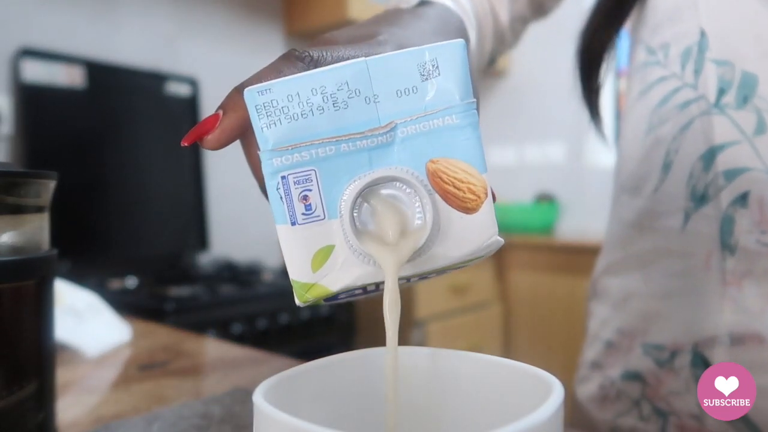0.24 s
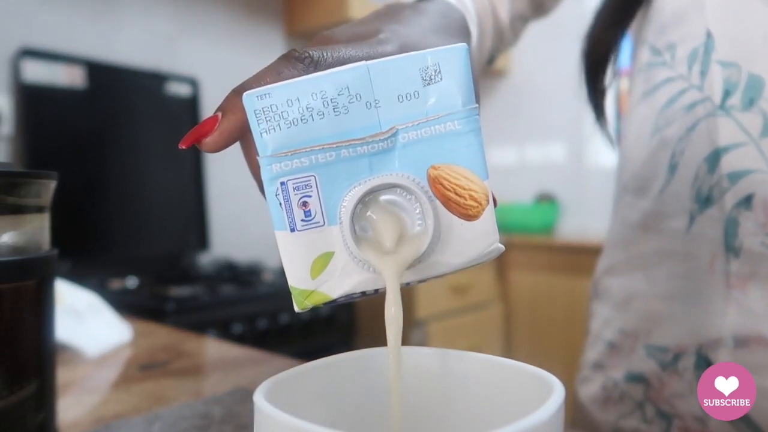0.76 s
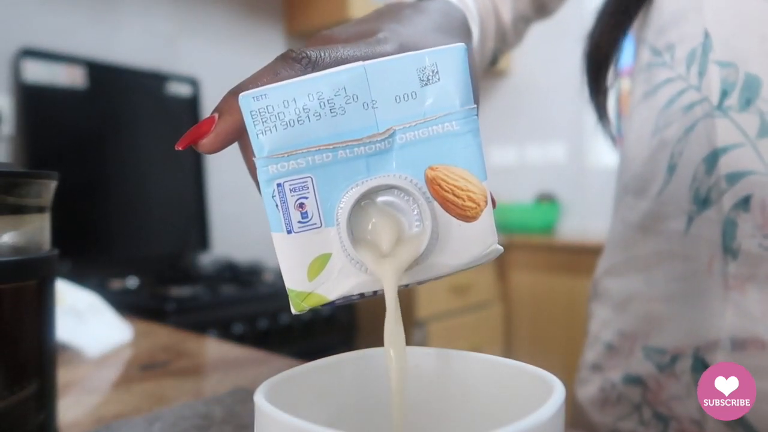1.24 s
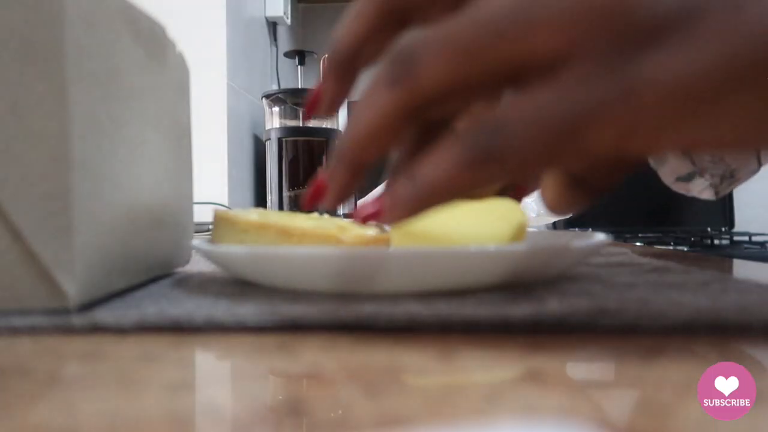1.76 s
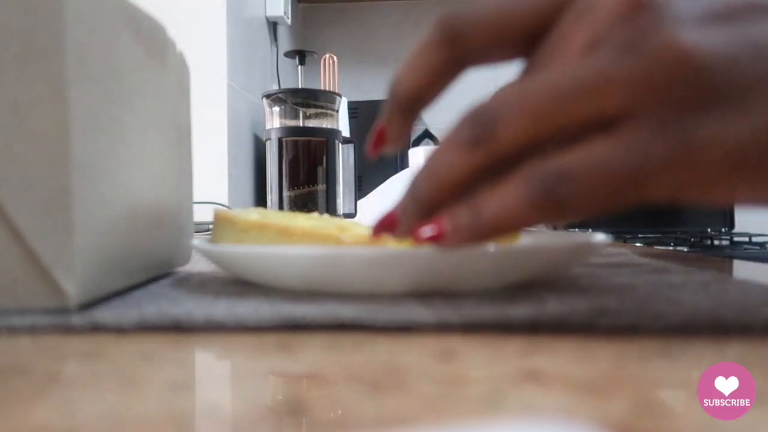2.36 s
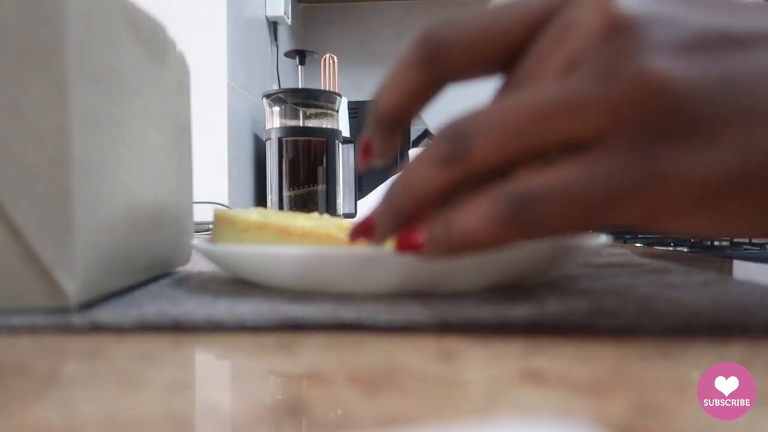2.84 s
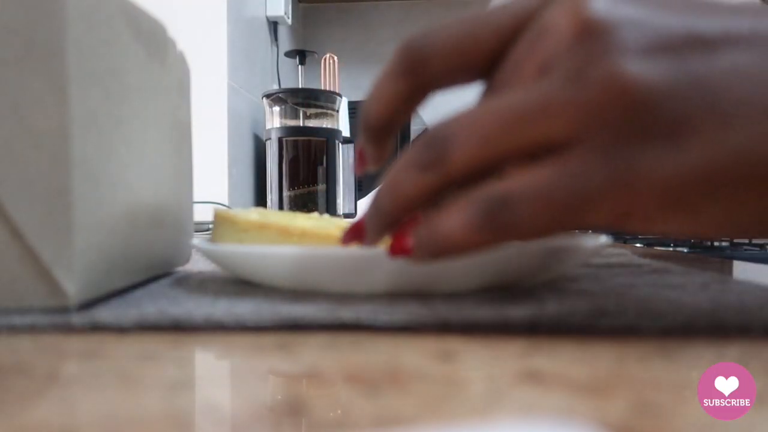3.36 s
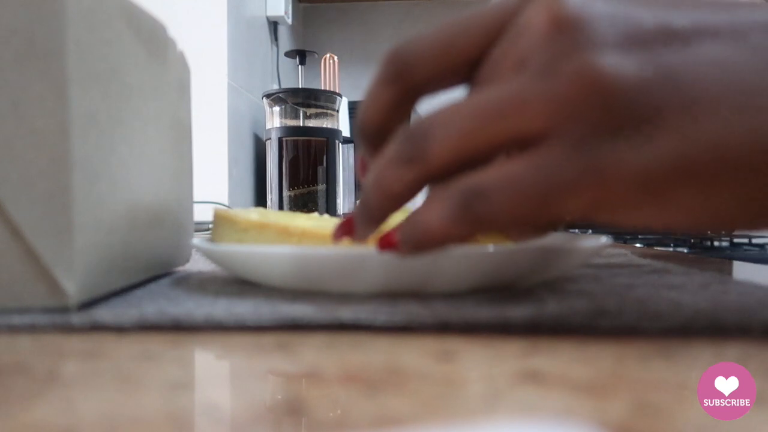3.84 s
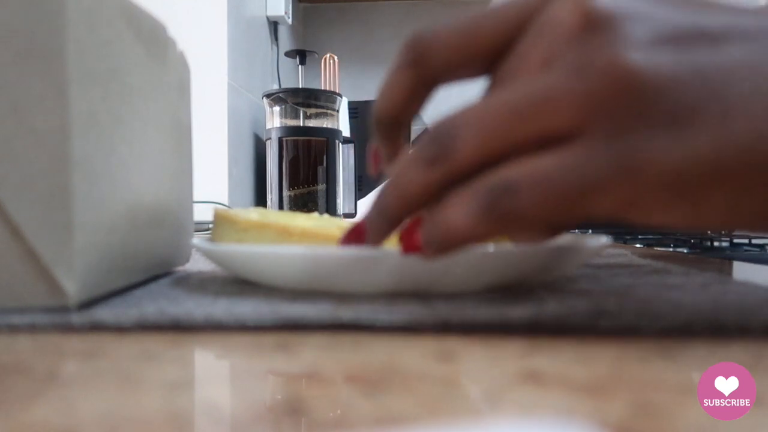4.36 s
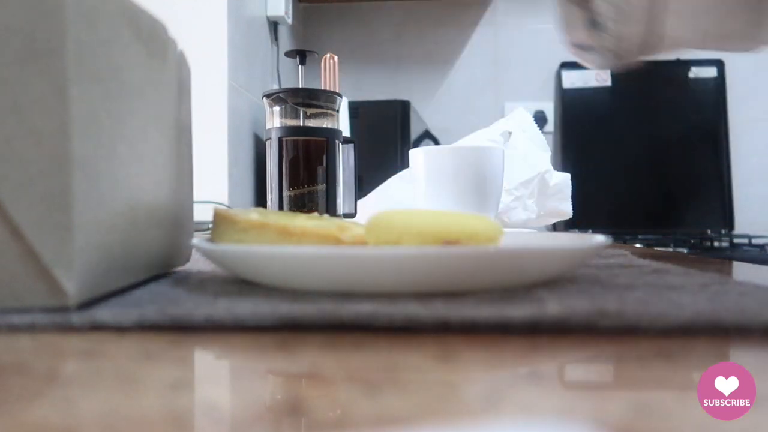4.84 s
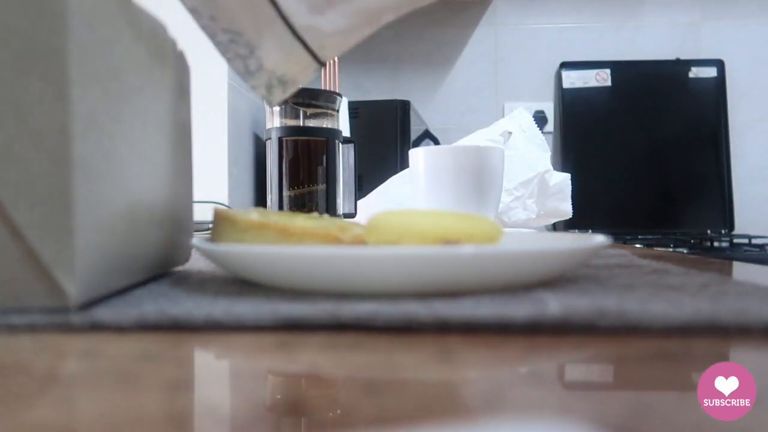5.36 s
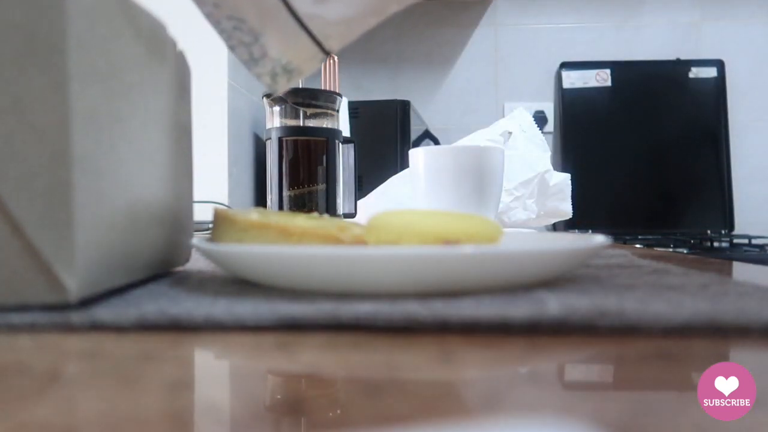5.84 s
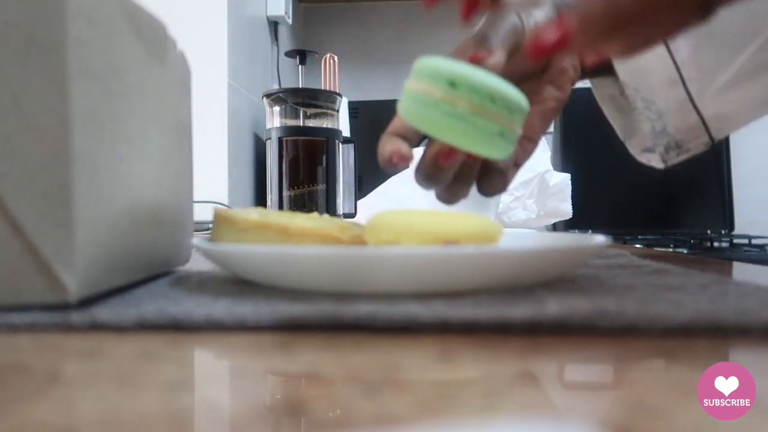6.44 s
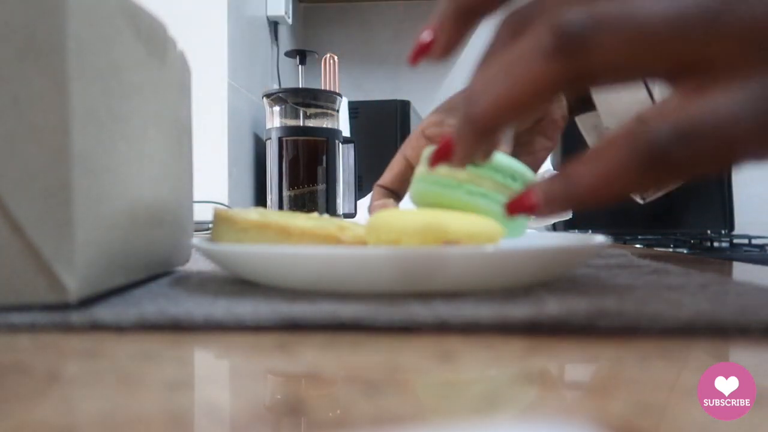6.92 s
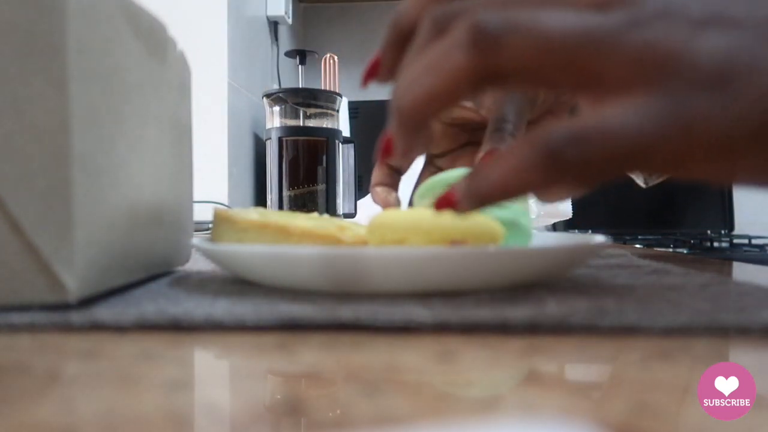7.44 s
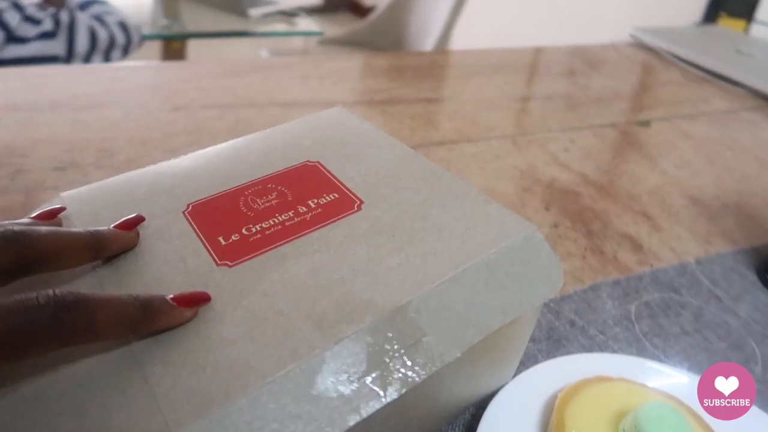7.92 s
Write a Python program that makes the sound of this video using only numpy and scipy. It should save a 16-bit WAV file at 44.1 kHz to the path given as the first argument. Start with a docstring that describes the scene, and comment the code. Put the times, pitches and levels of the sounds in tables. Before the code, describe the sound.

A nearly silent kitchen with faint low air and hiss lasts until 1.4 s, when a clothes dryer comes in at once. Its low, muffled rumble continues to the end, the drum turning about twice a second: soft wet-cloth thuds, harder clacks, button ticks and a light swish of sliding load fall in nearly the same pattern each turn, slowing imperceptibly after 5 s. Close to the counter-top stereo microphone, skin or sleeve brushes card from 1.5 to 2.5 s, with small nail ticks on china around 1.75-1.85 and 2.4 s. A clearer plate tick comes at 4.5 s, then light brushing. Between 5.35 and 5.85 s a cardboard box is tapped and scuffed, with the sharpest snap near 5.55. Brighter plate ticks follow at 7.1 and 7.4 s, with box thumps at 7.4 and 7.7. From 7.95 s the box slides with a swelling dry rasp, small taps and a brief low shudder at 8.1.

```python
"""Quiet kitchen noise, then a clothes dryer comes in at once, its drum turning about twice a second.
Noise through cabinet resonances makes its rumble; swelling notes knock at nearly the same places each turn.
Close by, fingernails tick on a china plate (decaying modes with a scratch of noise), and a cardboard
pastry box is tapped, scuffed, brushed and slid (clicks and noise through card resonances).
A small stereo microphone stands on the counter."""
import sys
import numpy as np
from scipy import signal
from scipy.fft import rfft, irfft, next_fast_len
from scipy.io import wavfile
from scipy.ndimage import uniform_filter1d

SR = 44100
rng = np.random.default_rng(int(sys.argv[2]) if len(sys.argv) > 2 else 0)


def unload_audio(sound):
    """Save the sound as a 16-bit wav file, at the path given as the first command line argument."""
    columns = np.transpose(np.atleast_2d(sound))
    # keep every value between -1 and 1, then stretch to whole-number steps
    steps = np.round(np.clip(columns, -1, 1) * 32767)
    wavfile.write(sys.argv[1], SR, steps.astype(np.int16))


N = 360958
TIME = np.arange(N) / SR
SIZE = next_fast_len(N + SR // 10, True)
FREQ = np.maximum(np.arange(SIZE // 2 + 1) * SR / SIZE, 1)


def undb(db):
    """Decibels to gain."""
    return 10 ** (np.asarray(db) / 20)


def unit(x):
    """Scale to rms 1."""
    return x / np.sqrt(np.mean(x ** 2))


def colour(points):
    """Gain at every frequency, drawn through (Hz, dB) points on a logarithmic frequency axis."""
    hz, db = np.transpose(points)
    return undb(np.interp(np.log(FREQ), np.log(hz), db))


def body(modes, freq=FREQ):
    """Complex response of a set of (Hz, width in Hz, dB) resonances."""
    return sum(undb(db) / (1 + 1j * (freq ** 2 - hz ** 2) / (freq * width)) for hz, width, db in modes)


def shape(x, response):
    """Filter a sound by a frequency response."""
    return irfft(rfft(x, SIZE) * response, SIZE)[..., :N]


def add(track, s, sound):
    """Mix a short sound into a track at s seconds."""
    start = max(int(s * SR), 0)
    part = sound[:max(N - start, 0)]
    track[start:start + len(part)] += part


def wander(count):
    """A random line through count evenly spaced points over the whole scene."""
    return np.interp(TIME, np.linspace(0, TIME[-1], count), rng.standard_normal(count))


# Microphone side signal against mid, for sound that fills the room.
# Each row: frequency in Hz, level in dB.
ROOM_WIDTH = [(60, -44), (110, -42), (200, -12.5), (380, -1), (700, -2), (2400, -3), (4400, 1), (8100, 0.5),
              (15000, 1.5)]
# The same for sound that arrives mostly straight from its source.
# Each row: frequency in Hz, level in dB.
STRAIGHT_WIDTH = [(60, -70), (200, -62), (380, -23.5), (700, -24), (1300, -10.5), (2400, -37), (4400, -12)]


def spread(mid, side, width):
    """Two close microphone ports: alike in the bass, less so higher up."""
    side = shape(side, colour(width))
    return np.array([mid + side, mid - side])


def diffuse(response, width):
    """Stereo noise of a given colour, its mid at rms 1."""
    mid, side = (unit(shape(rng.standard_normal(N), response)) for _ in range(2))
    return spread(mid, side, width)


def place(x, pan_db):
    """Put a near sound to the left (positive) or right (negative)."""
    return x * undb(np.array([[pan_db], [-pan_db]]) / 2)


def echo(x, t60):
    """Dense reflections from the kitchen walls, as strong as the sound itself."""
    t = TIME[:SR // 2]
    # the first reflection comes after 4 ms
    tail = rng.standard_normal(len(t)) * undb(-60 * t / t60) * (t > .004)
    return signal.fftconvolve(x, tail / np.linalg.norm(tail))[:N]


def room(x, t60, wet_db):
    """The wall reflections at both ports."""
    return undb(wet_db) * spread(echo(x, t60), echo(x, t60), ROOM_WIDTH)


# Colour of the still kitchen.
# Each row: frequency in Hz, relative level in dB.
KITCHEN_COLOUR = [(12, -31), (20, -2.5), (31, -4.5), (48, -10), (74, -9), (103, -4.5), (121, -7),
                  (302, -15.5), (367, -20), (638, -24.5), (1930, -30), (2280, -31.5), (2770, -33.5),
                  (12400, -51.5), (15000, -64)]
KITCHEN_DB = -47.5


def kitchen():
    """Faint steady air and hiss that fill the room: coloured noise, wide in the treble."""
    return undb(KITCHEN_DB) * diffuse(colour(KITCHEN_COLOUR), ROOM_WIDTH)


FIRST_TURN_S, TURN_S = 1.0234, .4986  # the turns are counted from before the drum is heard

# Wet cloth landing in the drum on every turn, heard along the counter.
# Each row: seconds into the turn, pitch in Hz, mean peak of the main note in dB, swell in seconds,
# share of pitch lost per second (negative: gained).
CLOTH_THUDS = [(.001, 94, -32.5, .012, 3), (.063, 119.5, -24.5, 0.015, 4), (.103, 100.2, -32, 0.023, 2),
               (.154, 116.6, -25.5, .018, -0.5), (.184, 179, -29.5, 0.014, 1.5),
               (.216, 144.7, -29.5, 0.024, 2), (.258, 122.6, -28, 0.02, 3), (.284, 127, -23.5, 0.011, 1),
               (.287, 192, -31.5, 0.0056, -0.5), (.28, 66, -30, 0.015, -2.5), (.331, 139, -29, 0.007, -4.5),
               (.348, 98.4, -33.5, 0.015, -0.5), (.346, 177, -36.5, .011, 1.5),
               (.383, 151.7, -34, 0.023, 1), (.39, 67.5, -35, 0.033, -0.5), (.421, 169.5, -28.5, 0.011, 6),
               (.438, 116, -29, 0.014, 0), (.488, 142.4, -31.5, 0.014, 3.5)]


def thuds():
    """Wet cloth lands softly: low notes with a faint overtone."""
    return knocks(CLOTH_THUDS, overtone=2.3, overtone_db=-13.5, grit=0.23)


# Hard parts of the load striking the drum on every turn.
# Each row: seconds into the turn, pitch in Hz, mean peak of the main note in dB, swell in seconds,
# share of pitch lost per second (negative: gained).
HARD_CLACKS = [(.041, 523.3, -40, 0.02, 1), (.067, 247, -39.5, 0.0042, 2.5),
               (.068, 316.7, -36.5, 0.02, 0.5), (.147, 460, -31, 0.0075, -2),
               (.151, 684, -44.5, 0.003, -10), (.165, 567, -36, 0.017, 1), (.166, 470.4, -35, 0.017, 1.5),
               (.162, 809.4, -37, 0.012, -1), (.168, 929, -47.5, 0.02, 0.5), (.203, 811, -46, .017, 3.5),
               (.25, 1247, -46, 0.033, 1.5), (.253, 977, -40, 0.0049, -0.5), (.258, 946, -41.5, 0.017, -1),
               (.259, 385, -35, 0.014, 0.5), (.263, 807, -39, .01, 0.5), (.284, 285, -29.5, 0.008, 0),
               (.322, 833, -43.5, 0.011, -0.5), (.324, 272.5, -34.5, 0.011, 0.5),
               (.345, 843, -44, 0.0098, .5), (.346, 1013, -48, .017, 1.5), (.376, 1229, -52.5, 0.015, 1.5),
               (.395, 442, -39, .014, 1)]


def clacks():
    """Hard parts strike the drum: mostly higher, rougher notes with an octave above."""
    return knocks(HARD_CLACKS, overtone=2.0, overtone_db=-15.0, grit=0.55)


def knocks(table, overtone, overtone_db, grit, brightening=1.0, scatter_db=1.1, jitter_s=0.00049):
    """Blows that land nearly alike on every turn; each swells and fades on its own note, weaker ones duller."""
    out, t = np.zeros(N), TIME[:SR // 8]
    hardest = max(row[2] for row in table)
    for turn in np.arange(FIRST_TURN_S, N / SR, TURN_S):
        for s, hz, db, swell, sag in table:
            late, force = rng.standard_normal(2)
            push = (t / swell * np.exp(1 - t / swell)) ** 2
            # the load drags as it lands: a random walk of phase smears the note
            steps = uniform_filter1d(rng.standard_normal(len(t)), size=64)
            drag = grit * np.sqrt(hz / SR) * np.cumsum(steps)
            phase = 2 * np.pi * hz * (t - sag * t ** 2 / 2) + drag
            overtone_gain = undb(overtone_db - brightening * (hardest - db))
            note = np.sin(phase) + overtone_gain * np.sin(overtone * phase)
            add(out, turn + s + jitter_s * late, undb(db + scatter_db * force) * push * note)
    return out


# Buttons and zips ticking on the drum wall on every turn.
# Each row: seconds into the turn, frequency in Hz, level in dB.
BUTTON_TICKS = [(.044, 559, -34.5), (.169, 677, -36), (0.194, 1160, -52), (.254, 1240, -42.5),
                (.267, 900, -42.5), (.324, 1170, -46), (.401, 834, -38)]


def buttons(attack_s=0.0021, decay_s=0.0039, width_share=0.49):
    """Small hard things tick on the drum wall: a sudden, quickly damped burst around one note."""
    out = np.zeros(N)
    for s, hz, db in BUTTON_TICKS:
        age = (TIME - FIRST_TURN_S - s) % TURN_S
        # cubing the resonance narrows it
        wall = unit(shape(rng.standard_normal(N), body([(hz, hz * width_share, 0)]) ** 3))
        out += undb(db) * wall * np.minimum(age / attack_s, 1) * np.exp(-age / decay_s)
    return out


# The load slipping down the drum wall on every turn.
# Each row: seconds into the turn, relative level in dB.
LOAD_SLIPS = [(0.043, 6), (0.15, 22), (0.247, 28)]
SLIP_ATTACK_S, SLIP_HOLD_S, SLIP_RELEASE_S, ROLLING_DB = 0.0042, 0.033, 0.1, -14


def sliding():
    """How hard the load slides: every slip starts quickly, holds and dies away over steady rolling."""
    slide = undb(ROLLING_DB)
    for s, db in LOAD_SLIPS:
        age = (TIME - FIRST_TURN_S - s) % TURN_S
        fade = np.exp(-np.maximum(age - SLIP_ATTACK_S - SLIP_HOLD_S, 0) / SLIP_RELEASE_S)
        slip = undb(db) * np.minimum(age / SLIP_ATTACK_S, 1) * fade
        slide = np.maximum(slide, slip)
    return slide


# Drum and cabinet resonances.
# Each row: frequency in Hz, width in Hz, relative level in dB.
CABINET_MODES = [(53, 7.5, -2.5), (71, 18, -4), (93.8, 10.7, -3), (111.6, 13.4, 3), (159.7, 16.5, 0.5),
                 (187.7, 30, -1), (264.6, 65, -2.5), (324, 4.6, -5.5), (385, 28.5, -0.5), (436, 33, -9.5),
                 (486, 82, -9.5), (613, 360, -17), (782, 21, -6), (960, 6.2, -4), (1120, 10, -33),
                 (1340, 31, -45)]
# Hiss of the sliding load.
# Each row: frequency in Hz, relative level in dB.
SWISH_COLOUR = [(150, -36), (400, -15), (780, 15.5), (1200, -8.5), (1500, -1), (2000, 0), (2600, -5.5),
                (4000, -15.5), (8000, -25.5), (15000, -50)]
DRUM_ON_S, DRUM_RISE_S = 1.405, 0.0075
SLOWS_S, SLOWING = 5.0, .0024  # from this time on the drum loses this share of its speed


def dryer(rumble_db=-35.5, rattle_db=-49.0, swish_db=-55, ring_db=-17, fresh=0.71,
          split_hz=330, lowest_hz=46, muffle_hz=1350, pan_db=-2.0):
    """The load rolls, slides and knocks in the drum, and the cabinet rings with the rolling and the blows."""
    slide = sliding()
    # the same bumps come round on each turn, with some fresh tumbling on top
    turn_bumps = rng.standard_normal(int(TURN_S * SR))
    bumps = np.resize(turn_bumps, N) + fresh * rng.standard_normal(N)
    cabinet = body(CABINET_MODES) / (1 + (lowest_hz / FREQ) ** 8) / (1 + (FREQ / muffle_hz) ** 8)
    low = 1 / (1 + (FREQ / split_hz) ** 4)
    # the heavy low modes roll on evenly; the light upper ones follow the sliding load
    rumble = undb(rumble_db) * unit(shape(bumps * slide ** 0.17, cabinet * low))
    rattle = undb(rattle_db) * unit(shape(bumps * slide ** 0.42, cabinet * (1 - low)))
    blows = thuds() + clacks()
    ringing = undb(ring_db) * shape(blows, cabinet)
    drum = blows + ringing + buttons() + rumble + rattle
    # slowing stretches time, and so lowers the pitch a little too
    slowed_time = TIME - SLOWING * np.maximum(TIME - SLOWS_S, 0)
    drum = np.interp(slowed_time, TIME, drum)
    swish = undb(swish_db) * unit(slide ** 0.71) * diffuse(colour(SWISH_COLOUR), STRAIGHT_WIDTH)
    # wall echoes reach the two ports unequally; only the upper notes show where the machine stands
    stereo = spread(drum, echo(drum, t60=0.1), STRAIGHT_WIDTH) + swish
    stereo = shape(stereo, place(np.ones(len(FREQ)), pan_db) ** (1 - low))
    return stereo * np.clip((TIME - DRUM_ON_S) / DRUM_RISE_S, 0, 1)


# Dry rubbing of cardboard, close to the microphone.
# Each row: frequency in Hz, relative level in dB.
RUB_COLOUR = [(300, 7), (550, 4), (1150, 7.5), (1420, 8), (1650, 7.5), (1950, 4.5), (2600, 8.5), (3100, 5),
              (3400, 3.5), (3950, 1), (4450, 1), (5100, 0.5), (5400, -4.5), (6300, -11), (8000, -13),
              (11000, -18.5), (15000, -29)]
# Fingers and sleeve brushing the box.
# Each row: start in seconds, length in seconds, level in dB before the pressure curve.
BOX_BRUSHES = [(1.516, 0.71, -54.5), (2.168, .39, -47), (4.696, 0.36, -57), (5.531, 0.18, -52.5),
               (5.81, 0.11, -44), (6.81, 0.3, -58), (7.356, 0.21, -54), (7.688, 0.14, -54)]


def brushes(soft_hz=3800):
    """Skin and cloth brush the card: noise under quickly rising, fading pressure, duller than the slide."""
    pressure = np.zeros(N)
    for s, length, db in BOX_BRUSHES:
        curve_s = [s, s + 0.021, s + length / 2, s + length]
        pressure += undb(db) * np.interp(TIME, curve_s, [0.0074, 0.8, 0.2, 0.02])
    return fibres(pressure * diffuse(colour(RUB_COLOUR) / (1 + (FREQ / soft_hz) ** 2), ROOM_WIDTH))


def fibres(rub, grain_db=3, judder_db=-0.5, upper_hz=2500):
    """Coarse and fine card fibres catch and slip independently; the hand judders over both."""
    coarse = shape(rub, 1 / (1 + (FREQ / upper_hz) ** 6))
    fine = rub - coarse
    caught = coarse * undb(grain_db * wander(count=2000)) + fine * undb(grain_db * wander(count=6000))
    return caught * undb(judder_db * wander(count=900))


# Ringing modes of the china plate.
# Each row: frequency in Hz, relative level in dB, free ring time (t60) in seconds.
PLATE_MODES = [(3005, 0, .12), (4640, -17, .6), (4668, -17.5, .65), (4730, -15, .15), (5500, -8, .1),
               (6790, -6, .11), (6975, -7, .1), (8630, -9, .11), (9675, -10, .13), (10850, -10, .05),
               (11010, -10, .13), (12480, -18, .1), (13570, -15, .12), (13990, -16, .07)]
# Nails on the plate, near the microphone.
# Each row: start in seconds, peak of the ringing in dB, brightest frequency in Hz, spread in octaves,
# multiplier of the free ring time.
NAIL_TICKS = [(1.7443, -50, 4800, .45, .5), (1.756, -48, 5330, .23, 0.44), (1.776, -54, 6900, 0.33, .7),
              (1.789, -52, 5500, 0.23, 0.46), (1.842, -46.5, 8000, 1.5, 1.4),
              (1.853, -43, 4700, 0.79, 0.52), (2.383, -44.5, 3730, 0.59, 0.54),
              (4.488, -38, 3220, 0.78, 0.5), (7.129, -38, 5550, 2.5, 0.69), (7.383, -46.5, 4300, .6, 0.89)]


def plate(scratch=0.18, scratch_s=0.0028, focus_db=6):
    """Nails scratch and tick china; each contact favours some modes, and close pairs beat as they fade."""
    out, t = np.zeros(N), TIME[:SR // 3]
    for s, db, bright_hz, octaves, free in NAIL_TICKS:
        ring = np.zeros(len(t))
        for hz, gain, t60 in PLATE_MODES:
            off_focus = np.log2(hz / bright_hz) / octaves
            fade = np.exp(-np.log(1000) * t / (t60 * free))
            ring += undb(gain - focus_db * off_focus ** 2) * fade * np.sin(2 * np.pi * hz * t)
        nail = body([(bright_hz, bright_hz * octaves, 0)]) ** 3
        noise = unit(shape(rng.standard_normal(len(t)), nail)[:len(t)])
        contact = scratch * noise * np.exp(-t / scratch_s)
        add(out, s, undb(db) * (ring / np.abs(ring).max() + contact))
    return place(out, pan_db=-.5) + room(out, t60=.5, wet_db=-11)


# Resonances of the box's card.
# Each row: frequency in Hz, width in Hz, relative level in dB.
CARD_MODES = [(1200, 190, 1), (1800, 300, 12.5), (2500, 220, 1), (2930, 260, 2), (3500, 430, 4),
              (4280, 420, 3.5), (5600, 500, -2), (7300, 900, 4.5)]
# Resonances of the box's flexing panel.
# Each row: frequency in Hz, width in Hz, relative level in dB.
PANEL_MODES = [(300, 200, 14), (548, 130, 14), (745, 100, 11)]


def cardboard(force, top_hz, thump_db, limit_hz=9000):
    """A force rings the card and flexes the panel; a softer contact takes off more of the top."""
    size = 2 * len(force)
    freq = np.maximum(np.fft.rfftfreq(size, 1 / SR), 1)
    soft = 1 / (1 + 1j * freq / top_hz - (freq / top_hz) ** 2) ** 2 / (1 + (freq / limit_hz) ** 8)
    card = body(CARD_MODES, freq) + undb(thump_db) * body(PANEL_MODES, freq)
    return irfft(rfft(force, size) * card * soft)[:len(force)]


# Taps on the box, near the microphone.
# Each row: start in seconds, peak in dB before placing and echo, top of the contact in Hz,
# crunch t60 in seconds, panel thump in dB.
BOX_TAPS = [(5.3597, -24, 1910, 0.023, 12), (5.4201, -20.5, 4030, 0.018, 8),
            (5.5451, -12, 4900, 0.0041, 3.5), (5.555, -34, 3200, 0.022, 7), (5.558, -23, 880, 0.023, 5),
            (5.5605, -44, 6000, .012, -4), (5.606, -25.5, 780, 0.043, 11), (5.624, -36, 1700, 0.054, 17),
            (5.7514, -22.5, 1100, 0.014, 14), (7.381, -24, 3580, 0.012, 28), (7.701, -36, 3580, .018, -3),
            (7.708, -25.5, 3780, .022, 32), (7.719, -37, 5600, .017, -9), (7.769, -32, 1680, 0.012, 3),
            (7.786, -36.5, 5400, .025, 0), (7.795, -44, 6500, .012, -7), (8.012, -23, 2600, .018, 14),
            (8.082, -33, 5000, 0.013, -6), (8.108, -34, 5000, .015, -6), (8.166, -34, 5200, 0.016, -3)]


def taps(crunch=0.13):
    """Stiff card snaps: a click and a short crunch ring the box's card and, more or less, its panel."""
    out, t = np.zeros(N), TIME[:SR // 10]
    for s, db, top_hz, t60, thump_db in BOX_TAPS:
        click = t == 0
        force = click + crunch * rng.standard_normal(len(t)) * np.exp(-np.log(1000) * t / t60)
        snap = cardboard(force, top_hz, thump_db)
        add(out, s, undb(db) * snap / np.abs(snap).max())
    return place(out, pan_db=1.0) + room(out, t60=0.47, wet_db=-9.0)


# Fingers scuffing over the card's edge, to the left of the microphone.
# Each row: start in seconds, length in seconds, level in dB before the grip curve,
# top of the contact in Hz.
EDGE_SCUFFS = [(5.615, .022, -41, 4100), (5.815, .025, -43, 2100), (5.834, .013, -37.5, 3500),
               (5.848, .011, -37.5, 2400), (7.355, .02, -46, 1900), (7.775, .028, -44.5, 1800)]


def scuffs(grain_db=3, thump_db=-3, release_s=.003):
    """A finger drags harder and harder in tiny catches, then slips off."""
    out, t = np.zeros(N), TIME[:SR // 10]
    for s, length, db, top_hz in EDGE_SCUFFS:
        # each catch holds its strength for 32 samples
        strength = np.repeat(rng.standard_normal(len(t)), 32)[:len(t)]
        catches = rng.standard_normal(len(t)) * undb(grain_db * strength)
        grip = np.minimum(t / length, 1) * np.exp(-np.maximum(t + release_s - length, 0) / release_s)
        add(out, s, undb(db) * grip * unit(cardboard(catches, top_hz, thump_db)))
    return place(out, pan_db=5) + room(out, t60=.4, wet_db=-8)


# The sliding box singing a little as it is pushed.
# Each row: frequency in Hz, width in Hz, level in dB.
SLIDE_MODES = [(1080, 140, 0), (3500, 240, 3), (3830, 170, 4), (5000, 200, -8), (7140, 300, -2)]
SHOVE_S, SHOVE_DB = 7.95, -40.5  # start, and level at full speed before the fibres catch
SHOVE_ATTACK_S, SHOVE_RISE_S, SHOVE_SWELL_DB = 0.04, 0.19, 10


def shove():
    """The box slides under the hand: it breaks loose, then swells as it gathers speed."""
    loose = np.clip((TIME - SHOVE_S) / SHOVE_ATTACK_S, 0, 1)
    speed = np.clip((TIME - SHOVE_S) / SHOVE_RISE_S, 0, 1)
    level = loose * undb(SHOVE_DB + SHOVE_SWELL_DB * (speed - 1))
    singing = 1 + np.abs(body(SLIDE_MODES))
    return fibres(level * diffuse(colour(RUB_COLOUR) * singing, STRAIGHT_WIDTH))


SHUDDER_S, SHUDDER_LENGTH_S, SHUDDER_HZ, SHUDDER_DB = 8.108, .08, 68, -29


def shudder():
    """The sliding box briefly shudders on the counter: a low hum that swells and fades."""
    age = np.clip(TIME - SHUDDER_S, 0, SHUDDER_LENGTH_S)
    swell = np.sin(np.pi * age / SHUDDER_LENGTH_S)
    return undb(SHUDDER_DB) * swell * np.sin(2 * np.pi * SHUDDER_HZ * age)


def scene():
    """Everything as it reaches the counter."""
    return kitchen() + dryer() + brushes() + plate() + taps() + scuffs() + shove() + shudder()


def record(dry):
    """The recorder cuts steeply above 14.8 kHz."""
    return signal.sosfilt(signal.ellip(8, .2, 70, 14800, fs=SR, output="sos"), dry)


dry = scene()
out = record(dry)
unload_audio(out)
```